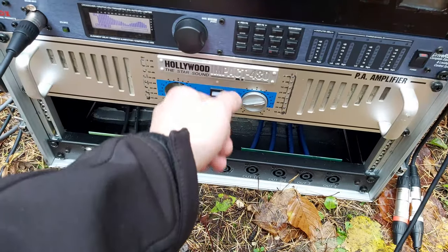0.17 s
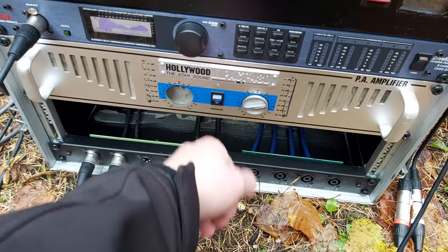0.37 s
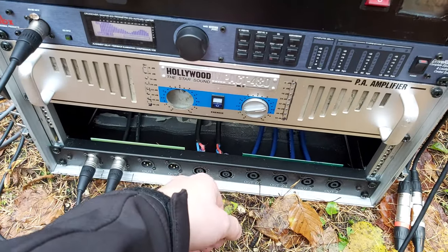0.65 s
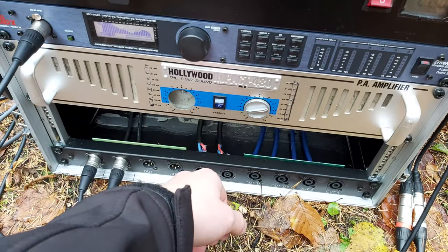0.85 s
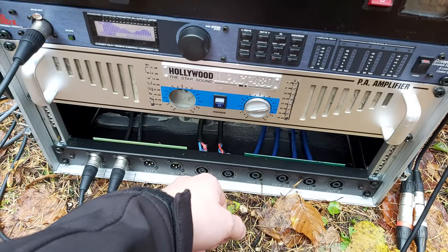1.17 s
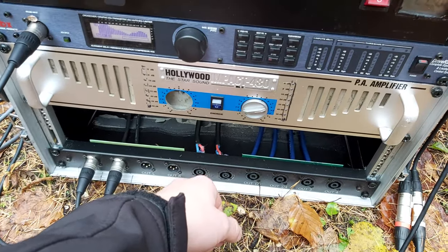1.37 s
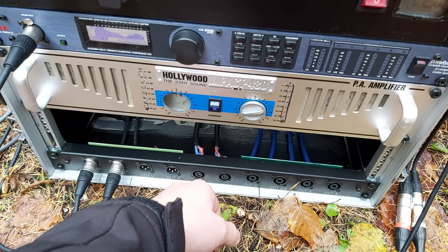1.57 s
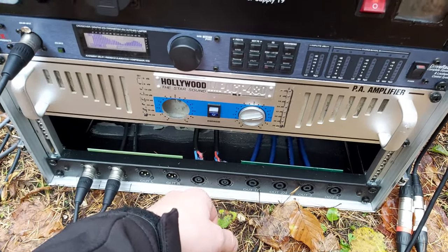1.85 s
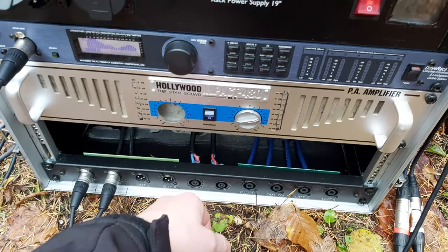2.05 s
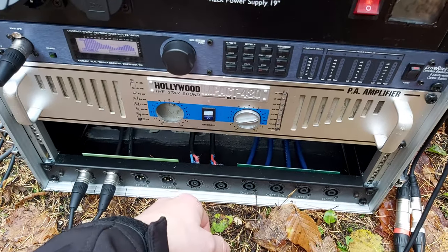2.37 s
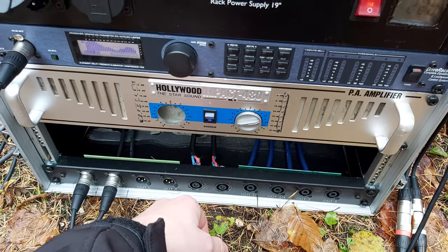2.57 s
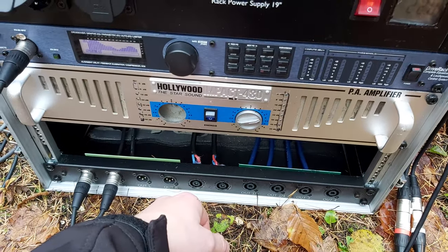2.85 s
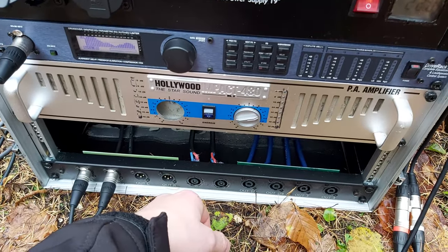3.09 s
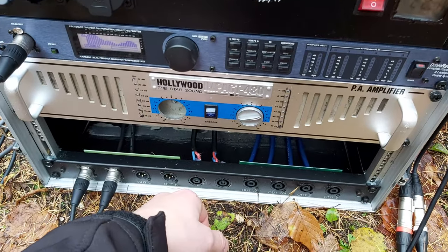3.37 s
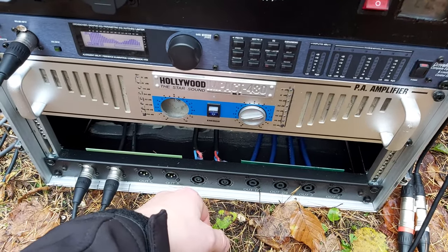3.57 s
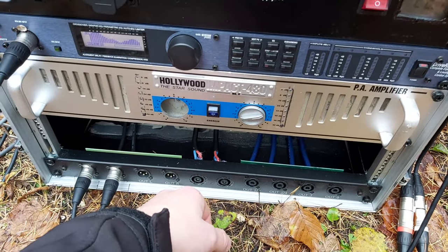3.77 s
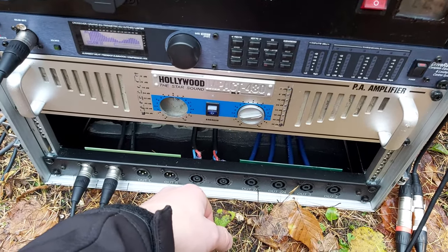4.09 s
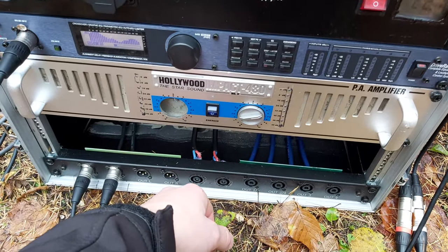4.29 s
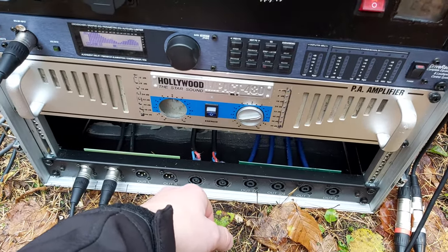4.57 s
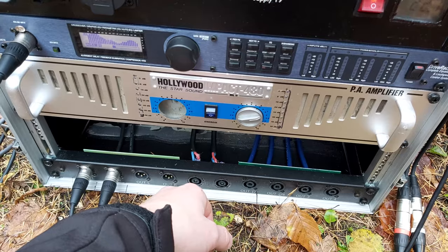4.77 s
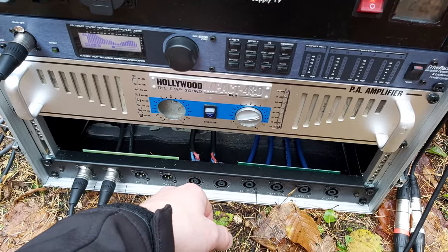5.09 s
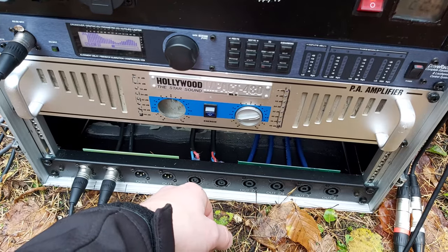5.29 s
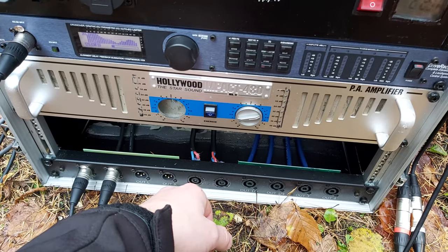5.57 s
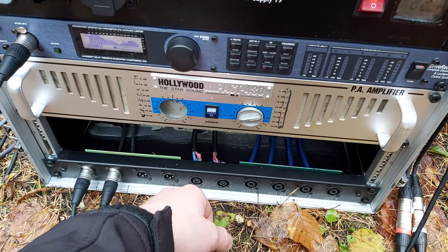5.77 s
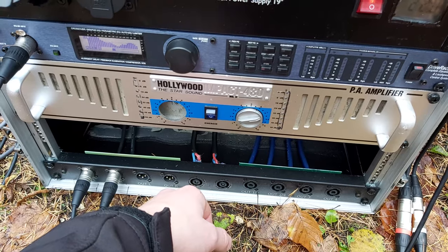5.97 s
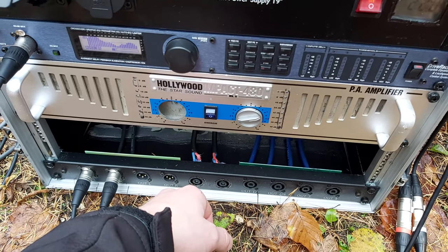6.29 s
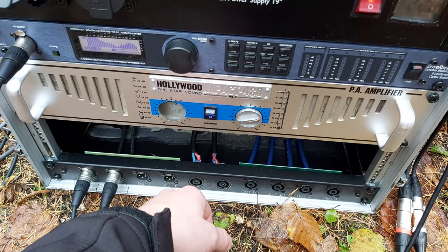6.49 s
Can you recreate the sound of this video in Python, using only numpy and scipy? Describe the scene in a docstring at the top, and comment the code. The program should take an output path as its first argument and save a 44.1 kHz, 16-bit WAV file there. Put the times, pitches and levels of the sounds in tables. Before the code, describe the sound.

Outdoor speakers pour out constant rumbling, rushing noise; after four seconds the low end is turned down and the mid-heavy hiss rises in steps.

```python
"""Loudspeakers in a wood emit steady broadband noise, heard by a hand-held camera beside the amplifier rack.
At first bass cabinets rumble under the hiss of upper cabinets: shaped noise, with echoes off rack, ground,
camera body and foliage combing the hiss differently at each microphone. The combing shifts as the pose changes,
and a soft band-limited swish passes on the right. Then the bass is turned down, and the upper cabinets
grow louder, mostly in the mids, by a rising gain on their noise spectrum."""
import sys
import numpy as np
from scipy import signal
from scipy.fft import rfft, irfft
from scipy.io import wavfile
from scipy.ndimage import uniform_filter1d, map_coordinates

SR = 44100
rng = np.random.default_rng(int(sys.argv[2]) if len(sys.argv) > 2 else 0)


def wrap_up_sound(samples):
    """Save the sound to the file named by the first command line argument, as 16-bit audio."""
    columns = np.atleast_2d(samples).T
    # keep every value between -1 and 1, then stretch to whole-number steps
    tamed = np.clip(columns, -1, 1)
    steps = np.round(tamed * 32767).astype(np.int16)
    wavfile.write(sys.argv[1], SR, steps)


N = 292824  # length [samples]

# Relative spectrum of the bass cabinets: (frequency [Hz], density [dB per Hz])
BASS_SPECTRUM = [(15, -47), (25, -43), (40, -18), (55, -5), (70, -3), (87, -1), (111, -5.5), (135, -15.5),
                 (162, -19), (200, -33), (260, -81), (440, -120)]
# Uneven level of the rumble's noise, short random swells and dips:
# (time [s], width [s], upper half [dB], deep half [dB])
RUMBLE_UNEVENNESS = [(.5, 0.018, 5, -10), (.85, 0.043, -7.5, 1), (1.44, 0.028, -0.5, -9),
                     (1.7, 0.02, -8, -2), (1.9, 0.035, -2, 5), (1.24, 0.028, 7.5, -4),
                     (2.36, 0.06, 2.5, 5.5), (2.52, 0.012, -7, -15), (3.92, 0.014, -6, -33),
                     (4.1, 0.015, 10, 6), (4.82, 0.068, -5.5, -6), (6.38, 0.027, -10, 3)]
# Rumble at the left microphone against the right: (frequency [Hz], level [dB], lag [rad])
LEFT_BASS_RESPONSE = [(25, -4.2, .05), (50, -9, -0.31), (71.4, -4.5, -0.21), (84, -2, -0.13),
                      (98, -1.3, -0.036), (118, -1.5, 0.44), (137, -5.5, 0.34), (175, -9.5, 0.3),
                      (220, 12, 0.067)]
# Rumble from all around against the direct: (frequency [Hz], level [dB])
DIFFUSE_BASS = [(25, -5), (45, -30), (75, -15), (105, -9), (140, -33), (250, -15)]
# Relative spectrum of the upper cabinets: (frequency [Hz], density [dB per Hz])
UPPER_SPECTRUM = [(20, -70), (90, -7), (150, -7.5), (230, -13.5), (380, -0.5), (560, -21), (800, -16.5),
                  (1300, -23), (2400, -23), (4000, -26.5), (6500, -35.5), (9000, -49), (12000, -50.5),
                  (14000, -49.5), (14800, -45), (15600, -58)]
# Rise of the upper cabinets: (time [s], gain [dB], lift of mids [dB], of low mids [dB], of upper mids [dB])
UPPER_RISE = [(0, -2, -2.5, 0.9, 2.5), (1, -2, -1, 0, -1.5), (2, -2, -0.5, -0.7, 1),
              (3, -1.5, -1.5, -0.1, -1.5), (4.2, -1.5, -0.5, 0, 0), (4.7, 0.5, -1.5, 1, 0.5),
              (4.92, 2, 4, 1, .5), (5.2, 4.5, 2.5, 0.3, 2), (5.5, 4.5, 4, 0, 2.5),
              (5.75, 7.5, 3, -1.5, 1.5), (6.2, 8.5, 2, .5, 2), (6.64, 8.5, 2, -1, -0.5)]
# How far each frequency follows the gain of the rise: (frequency [Hz], share [1])
RISE_SHARE = [(150, 0.33), (300, 0.66), (600, 0.56), (1200, 0.65), (2500, 0.73), (5000, 0.52), (9000, 0.38),
              (15000, 0.54)]
# Bell-shaped bands lifted in the rise, mids, low mids, upper mids: (centre [Hz], width [Hz])
LIFTED_BANDS = [(1260, 370), (380, 95), (3930, 230)]
# Sound paths to each microphone, tilt about 2 kHz:
# (delay [ms], signed gain [1], tilt [dB per octave], extra delay in the first pose [ms])
LEFT_ARRIVALS = [(1.884, -.15, -1.9, .037), (2.0, .47, -2.2, .004), (2.323, .16, .8, 0),
                 (2.601, -.06, 3.8, .034), (3.097, -.2, -1.2, .024), (3.357, -.12, 1.3, .031),
                 (3.663, .15, -.8, -.009), (3.795, .07, 0, .008), (4.234, -.18, .9, .01),
                 (4.372, -.14, .4, -.004), (4.653, -.2, .1, 0), (4.843, -.09, -1.9, .023),
                 (5.229, .14, 1.5, -.005), (5.527, .11, 1.6, -.021), (6.118, -.12, .7, -.018),
                 (6.646, .07, -3.8, .017)]
RIGHT_ARRIVALS = [(1.716, -.13, -1, .046), (1.902, 1, -.8, 0), (2.011, -.32, -.3, -.017),
                  (2.319, -.32, 6.1, -.008), (2.86, .21, 4.4, -.014), (3.021, -.4, 1.1, -.01),
                  (3.263, -.15, 3.4, 0), (3.395, .18, 4.2, -.032), (3.554, .23, 1, .007),
                  (3.826, -.15, 1.3, -.009), (4.049, -.14, -2.8, .006), (4.437, -.11, 0, -.018),
                  (4.781, -.23, 1.2, -.004), (5.086, .14, .1, .016), (5.229, -.21, -1.8, -.025),
                  (5.368, .12, -.5, -.023), (7.691, .12, .5, -.021)]
# Sound scattered by foliage against a path of gain 1: (frequency [Hz], level [dB])
SCATTERED_LEVEL = [(150, -36), (350, -21.5), (700, -12), (2000, -10.5), (6000, -3.5), (9000, 6),
                   (15500, 8.5)]
# Hiss from all around against a path of gain 1: (frequency [Hz], level [dB])
DIFFUSE_HISS = [(150, -30), (270, -19), (400, -30), (560, -28), (700, -17), (2000, -19), (6000, -29),
                (9000, -15), (15500, -9)]
# Camera pose, first nearer the rack: (time [s], share of the first pose [0-1])
POSE_SHARE = [(0, 1), (.6, 0.72), (1.7, 0.78), (1.95, 0), (6.64, 0.21)]
# Colour added in the first pose: (frequency [Hz], level [dB])
FIRST_POSE_COLOUR = [(2000, 1), (3500, 1), (5000, 4.5), (6500, -5), (8000, -3.5), (10000, -2), (12000, 3.5),
                     (15000, -1.5)]
# Echoes cancelling, or adding where negative, at both microphones: (centre [Hz], width [Hz], depth [dB])
SHARED_HOLLOWS = [(149, 17, -5), (191.3, 12.8, 9.5), (270, 9.1, 5), (404, 18, -1.5), (564.5, 12.6, 30),
                  (802, 15, 15), (919, 13.6, 13), (1310, 24, -1.5), (1706, 39, 0.5), (2153, 15, 1),
                  (2200, 17, 2.5), (2330, 28, -2), (2998, 32.6, 16), (3230, 82, 9), (3470, 50, 3),
                  (3843, 13.5, 18), (3918, 26, -2.5), (4217, 24, -5.5), (4260, 327, 5.5), (4980, 180, 5.5),
                  (5904, 41, 11), (6450, 177, 8), (7170, 200, 5.5), (7970, 58, -6), (7940, 160, -3.5),
                  (11500, 180, -1.5), (13700, 300, 8)]
# Fine dips and, where negative, peaks in each channel's hiss: (centre [Hz], width [Hz], left settled [dB],
# left first pose [dB], right settled [dB], right first pose [dB])
CHANNEL_COLOUR = [(225, 31, 1, 3, -2.5, -2), (446, 44, 1, 2.5, 0.5, 0.5), (800, 19, 4, -5.5, 2.5, -5),
                  (856, 30, 7, 2, -5, -3.5), (950, 20, 3, -10, 2, 0), (1356, 41, -1.5, -1, -1, -0.5),
                  (1430, 30, 4, -3, 1.5, 0.5), (1580, 30, -2, 6, 0, 0), (1740, 30, 2.5, 4, -.5, -5.5),
                  (2415, 65, 3, 2, 2.5, 2), (2750, 61, 4, 6, -1, -4), (2693, 37, 3, 5, 6, -7),
                  (2780, 39, -1.5, -4, 2, 3), (2976, 30, 3, -4, -2, -9), (3200, 120, -7.5, -6, -2, 1),
                  (3470, 65, 8, 3, 2, -2.5), (3590, 45, 6, -2, 1, 1), (3680, 20, -4, -8, 2, -12),
                  (3845, 30, -6, -5, 4, 6), (3850, 16, -12, -11, -2.5, 0), (3830, 85, 9, 10, -1.5, -1),
                  (4080, 45, 7, .5, 0.5, -0.5), (4400, 110, -6.5, 8, -1.5, -0.5),
                  (5050, 140, 7, 16, -2.5, -1.5), (5000, 110, -7, -2, -1.5, 1.5),
                  (5550, 140, 1, 5, 1, -0.5), (5790, 70, -2, -4.5, -2, 6), (5970, 70, -6, -1, -2.5, 5.5),
                  (6400, 136, -3, 0, 2, -8.5), (6630, 130, 2.5, 1, 1, 1), (7260, 240, -1.5, -2, -1.5, -3),
                  (6620, 360, -2.5, -13, -2.5, -4), (7180, 160, -4, -3, 1, -4), (8010, 70, 4, 1, -1, -1),
                  (8150, 230, -4, -3, 6.5, 2), (8600, 70, 4.5, -3.5, -0.5, 4),
                  (8870, 350, -5.5, -5.5, -1, -1.5), (9100, 500, 12, 1, -2, -2.5), (9900, 70, 3, .5, 6, 2),
                  (10280, 94, -1, 4, -3.5, -4), (10850, 160, 3.5, -.5, 2, -1.5),
                  (11370, 110, -1, -3.5, 2, 1), (11800, 160, 0, 3, -4, 3.5), (12100, 60, 1, 0, 4, 0),
                  (12700, 200, -4, 4, 0.5, -2), (13100, 120, 4, 3.5, 2.5, 3),
                  (13400, 110, -4, -3.5, -4, -2), (14600, 240, 4.5, 2, 5, 5),
                  (15250, 160, 6, -1.5, -.5, -3), (12800, 150, 6, 4, 0, 2), (12950, 120, 2, 0, -6, -2),
                  (13600, 350, -3, -2, -3.5, -2), (14800, 250, 8, 5, 4, 3), (15000, 200, 8, 8, 8, 6),
                  (15550, 120, -2, -2, -3, -2)]

BASS_DB, DEEP_DB = -19.5, -0.3  # initial level of the upper half of the rumble; deep half against it
DEEP_SAG_DB_PER_S = -0.67  # the deep half slowly thins
TURN_DOWN_S, TURN_DOWN_LENGTH_S, TURN_DOWN_DB = 4.306, 0.13, -7.5
BASS_FOLLOWS, WAVER_DB = 0.22, 1.5  # share of the upper cabinets' gain; rms waver of each half
UPPER_DB = -26.5  # rms level of the upper cabinets over the whole scene
COMMON_HISS_HZ, COMMON_HISS_WIDTH_HZ, COMMON_HISS_DB = 13600, 390, 6  # the same in both channels
SLIDE = 0.0052  # rms share by which the fine channel colour slides in pitch
SWISH_S, SWISH_DB, SWISH_RISE_DB_PER_S, SWISH_FALL_DB_PER_S = 1.73, -42.5, 92, 58
SIZE, HOP = 2048, 512  # short-time spectrum: window and step [samples]
EDGE_HZ = 15730  # upper band limit


def bass_cabinets():
    """Spectral shaping: two bands of low noise waver apart, with a direct and a diffuse sound field."""
    hz, t = np.fft.rfftfreq(N, 1 / SR), np.arange(N) / SR
    noise, *around = rfft(rng.standard_normal((3, N))) * amp(over_hz(BASS_SPECTRUM, hz))
    deep_share = 1 / (1 + (hz / 73.0) ** 8)  # smooth crossover at 73 Hz
    deep = held(evened(irfft(noise * deep_share, N)))
    upper = held(evened(irfft(noise * (1 - deep_share), N)))

    coarse_t = t[::HOP]
    upper_db, deep_db = (np.interp(t, coarse_t, db) for db in bass_levels(coarse_t))
    direct = amp(upper_db) * upper + amp(deep_db) * deep

    left_table = np.array(LEFT_BASS_RESPONSE)
    left_db = over_hz(left_table[:, [0, 1]], hz)
    lag = over_hz(left_table[:, [0, 2]], hz)
    left = irfft(rfft(direct) * amp(left_db) * np.exp(-1j * lag), N)
    right = amp(-0.22) * direct

    diffuse = irfft(around * amp(over_hz(DIFFUSE_BASS, hz)), N)
    diffuse = diffuse / irfft(noise, N).std() * amp(upper_db)
    return np.array([left, right]) + diffuse


def bass_levels(t):
    """Gain control: a step down, then a share of the rise; each half's noise is uneven and wavers in level."""
    turned = np.clip((t - TURN_DOWN_S) / TURN_DOWN_LENGTH_S, 0, 1)
    rise_db = over_time(np.array(UPPER_RISE)[:, :2], t)
    knob_db = BASS_DB + TURN_DOWN_DB * turned + BASS_FOLLOWS * rise_db

    s, width, upper_uneven_db, deep_uneven_db = np.transpose(RUMBLE_UNEVENNESS)
    bells = bump(t[:, None], s, width)
    upper_db = knob_db + bells @ upper_uneven_db + WAVER_DB * waver(t)
    deep_db = knob_db + DEEP_DB + DEEP_SAG_DB_PER_S * t + bells @ deep_uneven_db + WAVER_DB * waver(t)
    return upper_db, deep_db


def waver(t, count=30):
    """Superposition: sinusoids of 2-12 Hz in random phase give a quick wobble of rms 1."""
    hz, phase = np.geomspace(2, 12., count), rng.random(count)
    return evened(np.sin(2 * np.pi * (np.outer(t, hz) + phase)).sum(axis=1))


def held(x):
    """Limiting: gain falls as the smoothed power of a band swells; rms 1."""
    power = uniform_filter1d(uniform_filter1d(x ** 2, size=1500), size=1500)
    swell = np.sqrt(abs(power) + .02)
    return evened(x / swell ** 0.3)


def upper_cabinets():
    """Interference: near paths comb one noise; scattered, diffuse and common noises add to it incoherently."""
    hz, t = np.fft.rfftfreq(SIZE, 1 / SR), np.arange(N // HOP + 5) * HOP / SR
    real, imaginary = rng.standard_normal((2, len(t), len(hz), 5))
    direct, bounced, common, *around = (real + 1j * imaginary).T
    pose = over_time(POSE_SHARE, t)

    hollow = amp(-sum(db * bump(hz, f, width) for f, width, db in SHARED_HOLLOWS))[:, None]
    turn = 1.0 * pose + 0.48 * sway(t)  # radians
    scatter = amp(over_hz(SCATTERED_LEVEL, hz))[:, None]
    diffuse_gain = amp(over_hz(DIFFUSE_HISS, hz))[:, None]
    # a narrow high hiss, the same in both channels
    common_hiss = amp(COMMON_HISS_DB) * bump(hz, COMMON_HISS_HZ, COMMON_HISS_WIDTH_HZ)[:, None] * common
    ears = []
    for arrivals, diffuse in zip((LEFT_ARRIVALS, RIGHT_ARRIVALS), around):
        near = near_paths(arrivals, hz, pose) * direct
        scattered = scatter * foliage(hz, turn) * bounced
        ears.append(hollow * (near + scattered) + diffuse_gain * diffuse + common_hiss)

    dips_db = slid(channel_colour(hz, pose), SLIDE * sway(t))
    spectra = amp(upper_colour(hz, t, pose) - dips_db) * ears
    sound = signal.istft(spectra, nperseg=SIZE, noverlap=SIZE - HOP)[1][:, :N]
    return amp(UPPER_DB) * evened(sound)


def upper_colour(hz, t, pose):
    """Time-varying spectrum: cabinet response, rise, lifted bands, pose colour and drifting patches sum in dB."""
    s, gain_db, *lifts_db = np.transpose(UPPER_RISE)
    rise_db = np.outer(over_hz(RISE_SHARE, hz), np.interp(t, s, gain_db))
    colour_db = over_hz(UPPER_SPECTRUM, hz)[:, None] + rise_db
    for (centre, width), db in zip(LIFTED_BANDS, lifts_db):
        colour_db += np.outer(bump(hz, centre, width), np.interp(t, s, db))
    return colour_db + np.outer(over_hz(FIRST_POSE_COLOUR, hz), pose) + patches(hz, t)


def near_paths(arrivals, hz, pose):
    """Comb filtering: delayed arrivals interfere; the responses of the two poses are blended."""
    ms, gain, tilt_db, shift_ms = np.transpose(arrivals)
    settled = paths(ms, gain, tilt_db, hz)
    first = paths(ms + shift_ms, gain, tilt_db, hz)
    return np.outer(settled, 1 - pose) + np.outer(first, pose)


def paths(ms, gain, tilt_db, hz):
    """Superposition: the frequency response is a sum of delayed arrivals, each with a spectral tilt."""
    octaves = np.log2(np.maximum(hz, 100) / 2000)[:, None]
    delayed = np.exp(-2j * np.pi * hz[:, None] * ms / 1000)
    return (delayed * amp(tilt_db * octaves)) @ gain


def foliage(hz, turn, count=60, spread_ms=12.0):
    """Multiple scattering: random small reflectors make ragged stripes; as the camera turns, others take over."""
    delay, sign = rng.random((count, 2, 2)).T
    gain = np.sign(sign - .5) / np.sqrt(count)
    one_set, other_set = (paths(spread_ms * d, g, 0, hz) for d, g in zip(delay, gain))
    stripes = np.outer(one_set, np.cos(turn)) + np.outer(other_set, np.sin(turn))
    local_power = uniform_filter1d(abs(stripes) ** 2, size=7, axis=0)
    return stripes / np.sqrt(local_power + 1e-9)  # level evened along frequency


def channel_colour(hz, pose):
    """Spectral colour: fine dips and, where negative, peaks [dB] in each channel's hiss, blended between poses."""
    f, width, left, left_first, right, right_first = np.transpose(CHANNEL_COLOUR)
    bells = bump(hz[:, None], f, width)
    return np.array([np.outer(bells @ settled, 1 - pose) + np.outer(bells @ first, pose)
                     for settled, first in ((left, left_first), (right, right_first))])


def slid(field, share):
    """Frequency scaling: each moment's spectrum is read at 1 + share times its frequency."""
    bins, frames = np.indices(field.shape[1:])
    places = [bins * (1 + share), frames]
    return np.array([map_coordinates(ear, places, order=1, mode="nearest") for ear in field])


def sway(t, count=20):
    """Superposition: sinusoids of 0.2-6 Hz, weaker upwards, give the slow wobble of a hand, rms 1."""
    hz, phase = np.geomspace(.2, 6, count), rng.random(count)
    return evened(np.sin(2 * np.pi * (np.outer(t, hz) + phase)) @ (1 / np.sqrt(hz)))


def patches(hz, t, patchy_db=1.4):
    """Random modulation: smoothed noise drifts the treble colour as the camera wobbles, less below 3300 Hz."""
    field = rng.standard_normal((len(t), len(hz)))
    field = uniform_filter1d(field, size=12, axis=0)
    field = uniform_filter1d(field, size=20, axis=1)
    return patchy_db * evened(field).T * np.clip(hz / 3300.0, 0, 1)[:, None]


def swish():
    """Friction noise, perhaps a sleeve brushing past on the right: a band with exponential rise and decay."""
    band = signal.butter(4, [4300., 5700.], "band", fs=SR, output="sos")
    noise = evened(signal.sosfilt(band, rng.standard_normal((2, N))))
    since = np.arange(N) / SR - SWISH_S
    envelope_db = SWISH_DB + np.minimum(SWISH_RISE_DB_PER_S * since, -SWISH_FALL_DB_PER_S * since)
    return noise * amp([[-14.], [0]]) * amp(envelope_db)  # left 14 dB weaker


def amp(db):
    """Logarithmic level: decibels to amplitude gain."""
    return 10 ** (np.asarray(db) / 20)


def evened(x):
    """Normalization: scales to rms 1."""
    return x / np.sqrt(np.mean(x ** 2))


def over_hz(points, hz):
    """Interpolation of a spectrum on a logarithmic frequency axis."""
    f, value = np.transpose(points)
    return np.interp(np.log(hz + 1), np.log(f + 1), value)


def over_time(points, t):
    """Linear interpolation of a curve in time."""
    return np.interp(t, *np.transpose(points))


def bump(x, centre, width):
    """Gaussian bell of height 1, over frequency or time."""
    return np.exp(-.5 * ((x - centre) / width) ** 2)


def scene():
    """Superposition of both sets of cabinets and the swish."""
    return bass_cabinets() + upper_cabinets() + swish()


def record(dry):
    """Band limitation: the microphones lose the deepest bass, the recorder the highest treble."""
    thin = signal.sosfilt(signal.butter(4, 32., "high", fs=SR, output="sos"), dry)
    lowpass = signal.firwin(2047, EDGE_HZ, window=("kaiser", 9), fs=SR)
    return signal.oaconvolve(thin, lowpass[None], "same")


dry = scene()
out = record(dry)
wrap_up_sound(out)
```